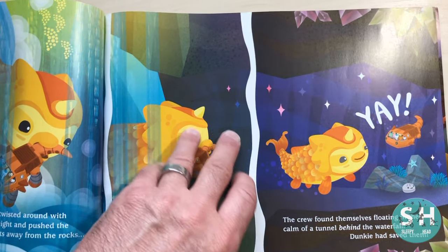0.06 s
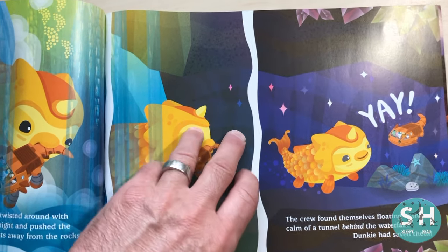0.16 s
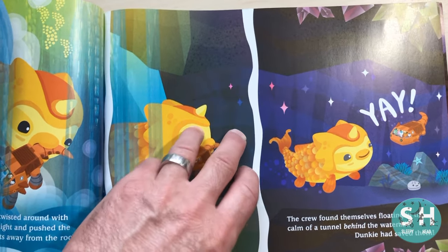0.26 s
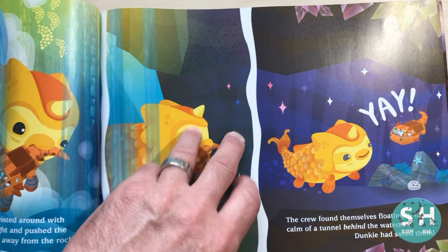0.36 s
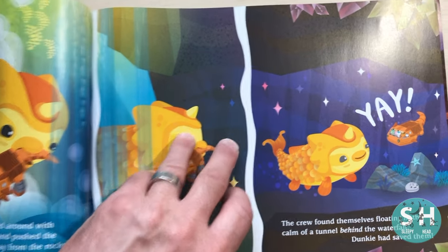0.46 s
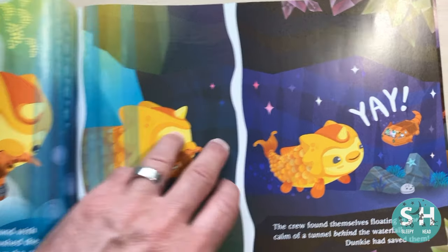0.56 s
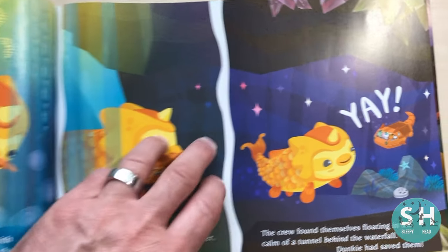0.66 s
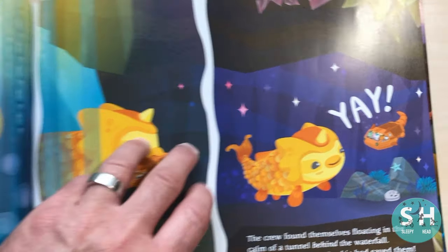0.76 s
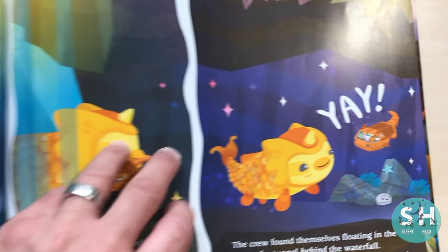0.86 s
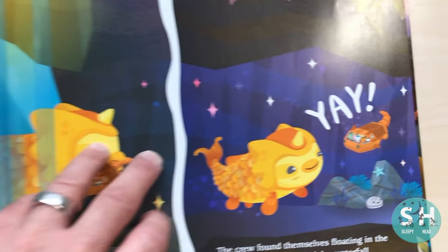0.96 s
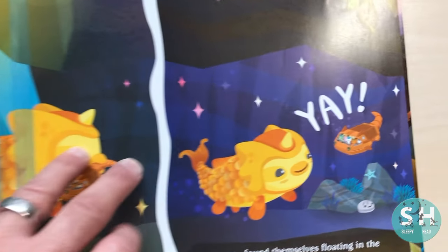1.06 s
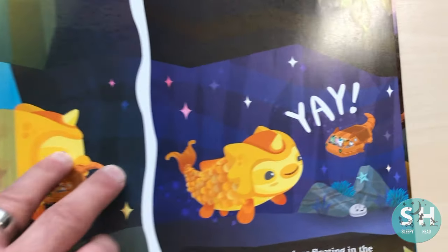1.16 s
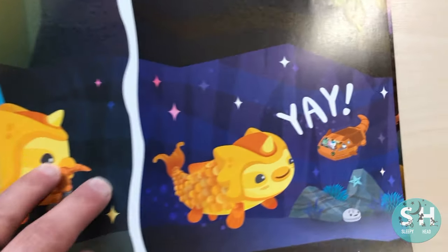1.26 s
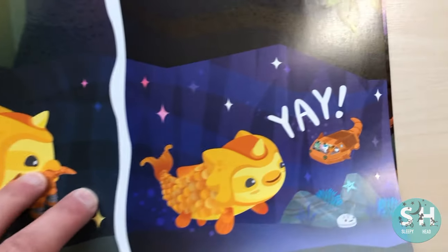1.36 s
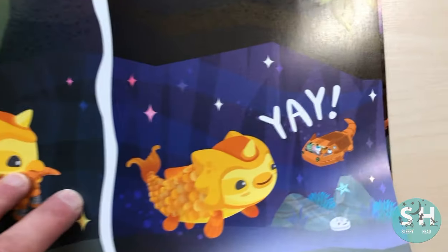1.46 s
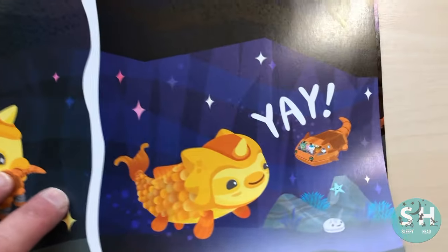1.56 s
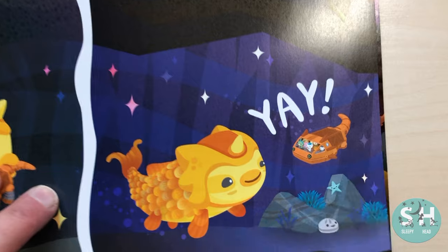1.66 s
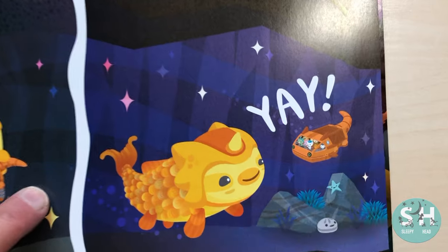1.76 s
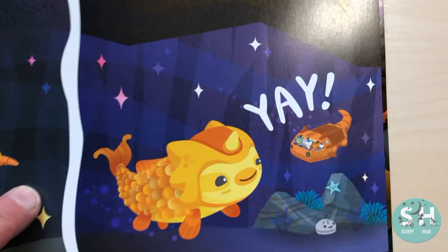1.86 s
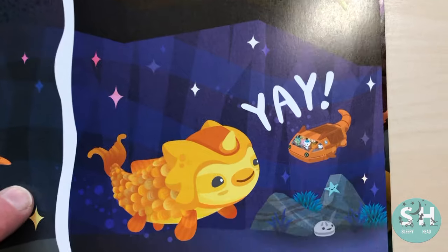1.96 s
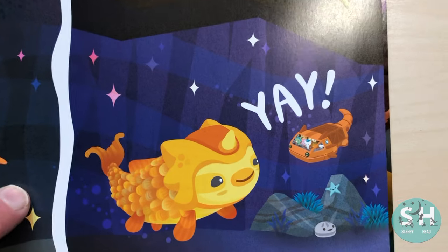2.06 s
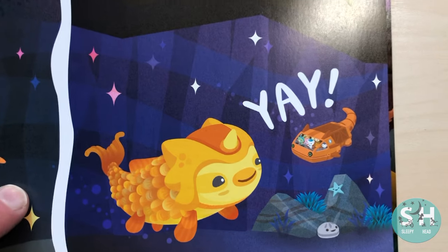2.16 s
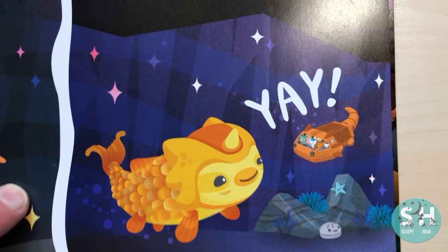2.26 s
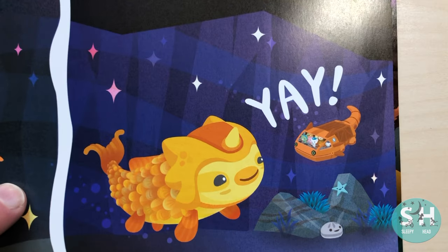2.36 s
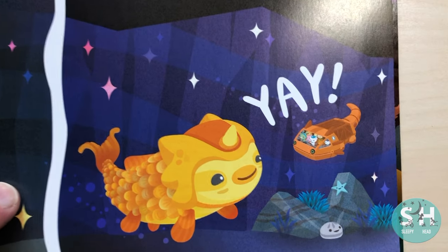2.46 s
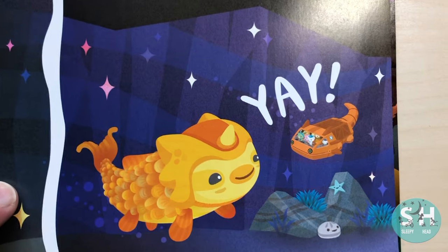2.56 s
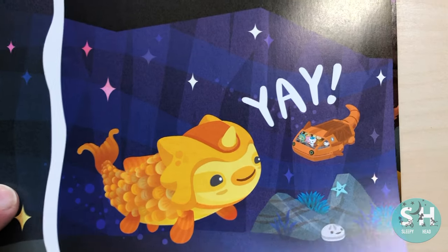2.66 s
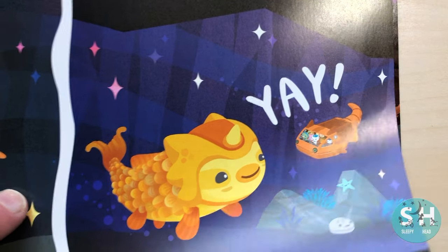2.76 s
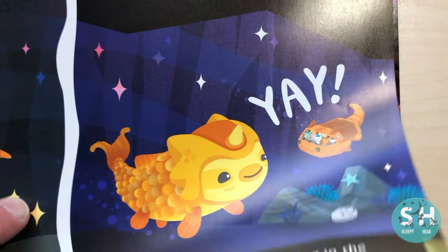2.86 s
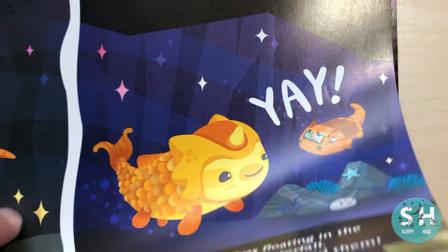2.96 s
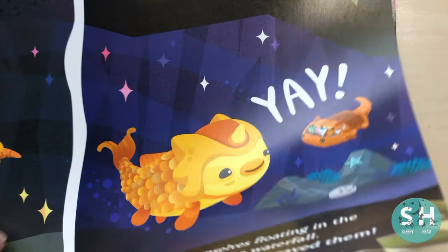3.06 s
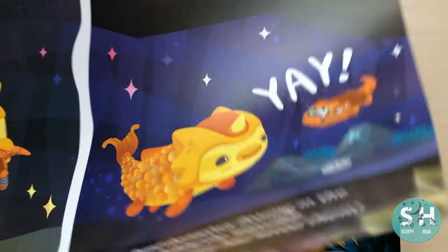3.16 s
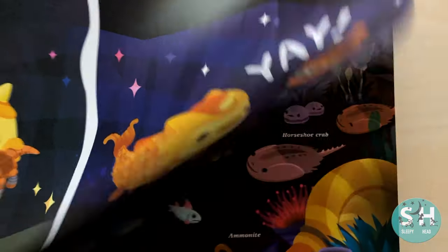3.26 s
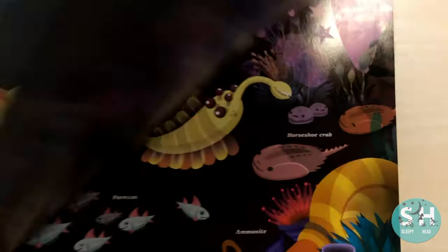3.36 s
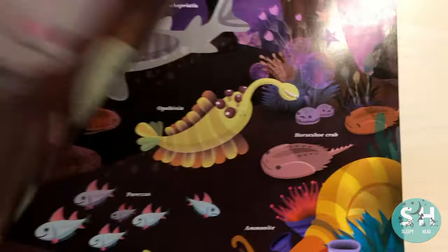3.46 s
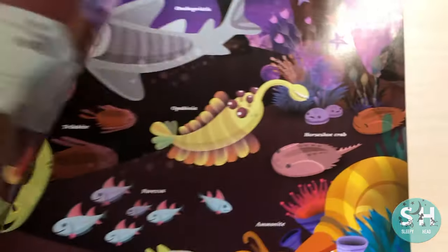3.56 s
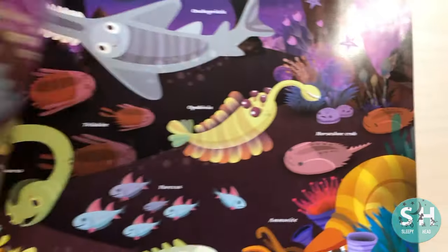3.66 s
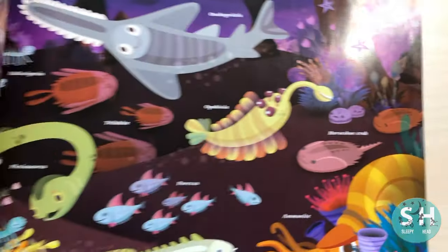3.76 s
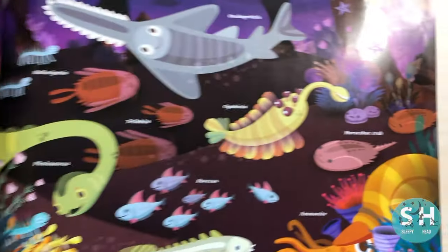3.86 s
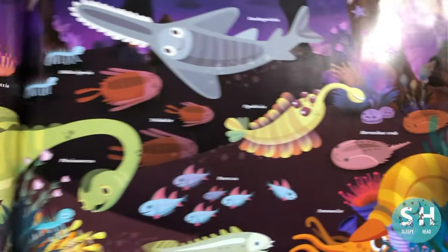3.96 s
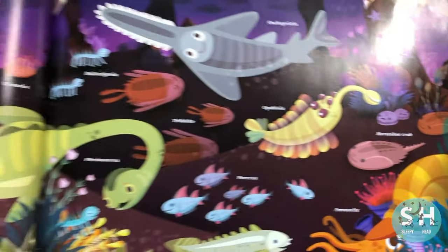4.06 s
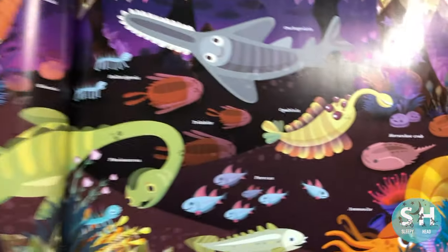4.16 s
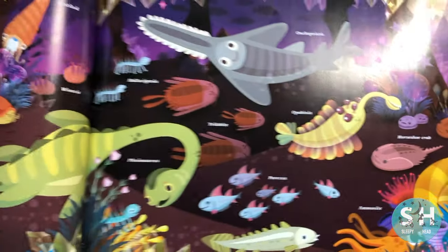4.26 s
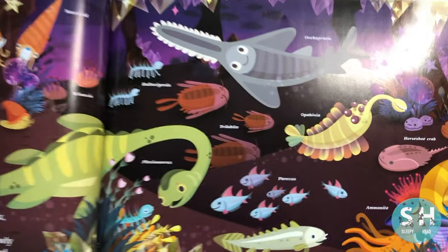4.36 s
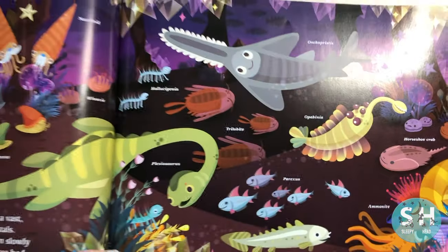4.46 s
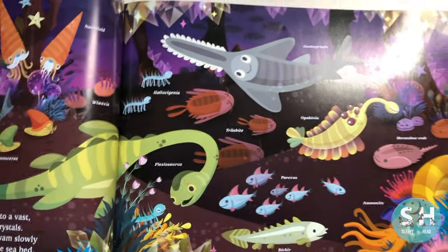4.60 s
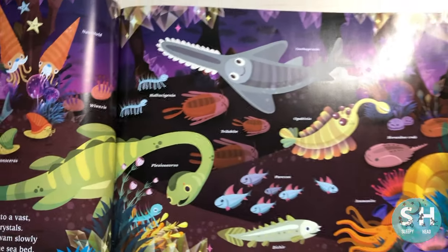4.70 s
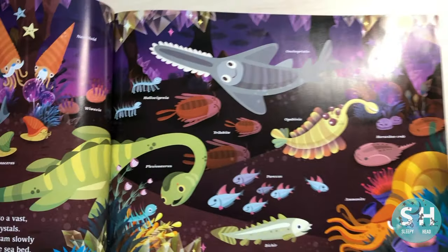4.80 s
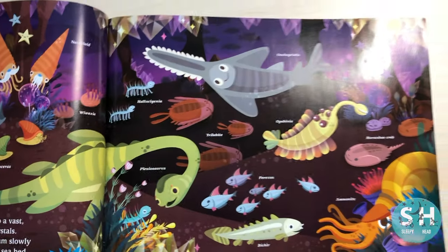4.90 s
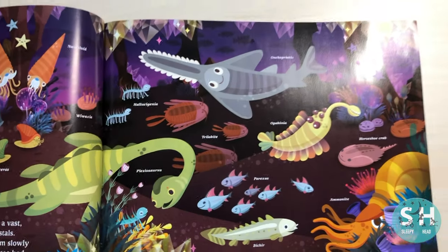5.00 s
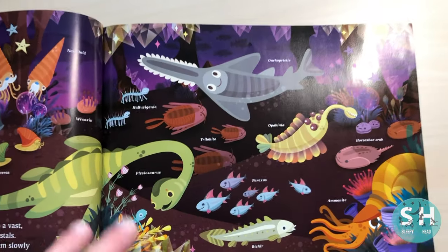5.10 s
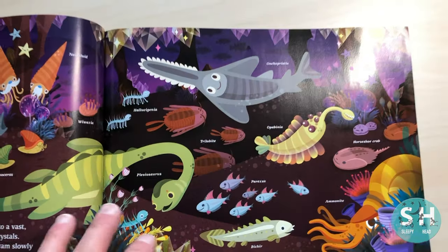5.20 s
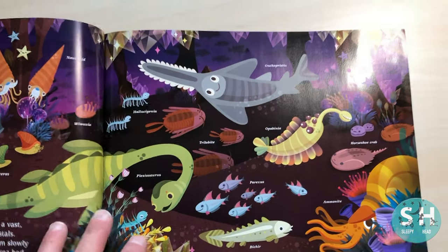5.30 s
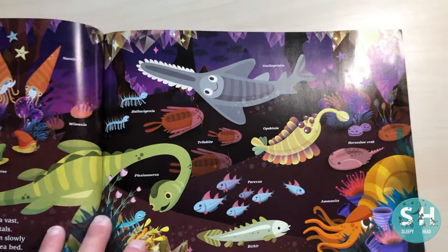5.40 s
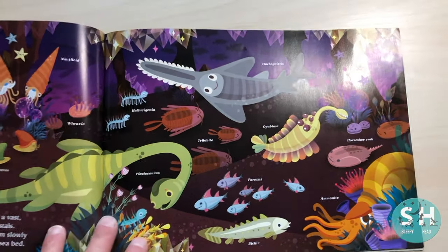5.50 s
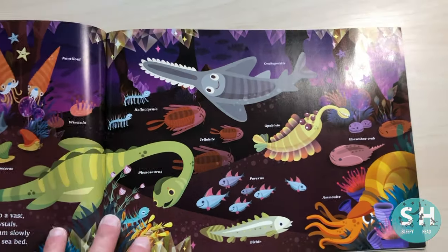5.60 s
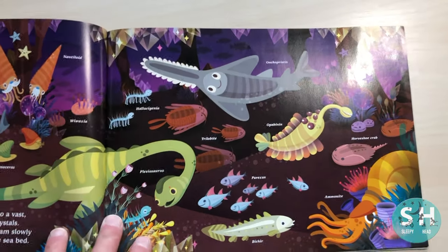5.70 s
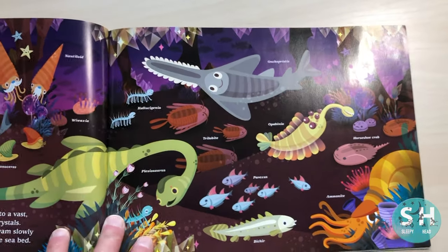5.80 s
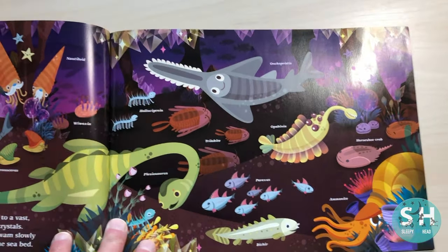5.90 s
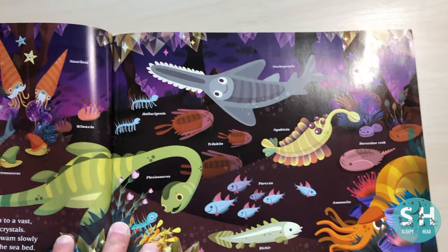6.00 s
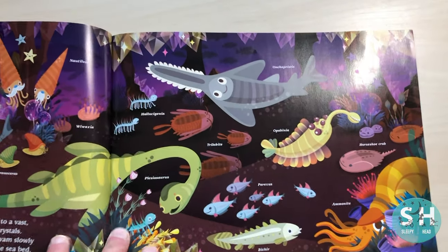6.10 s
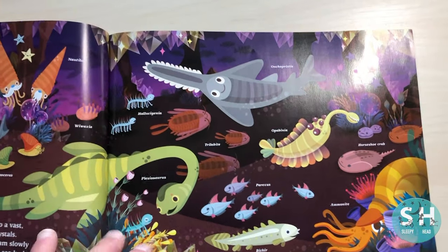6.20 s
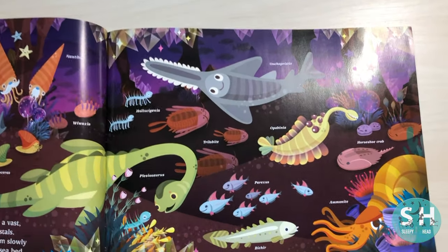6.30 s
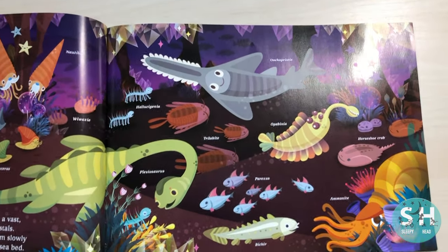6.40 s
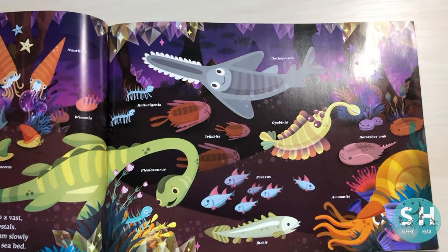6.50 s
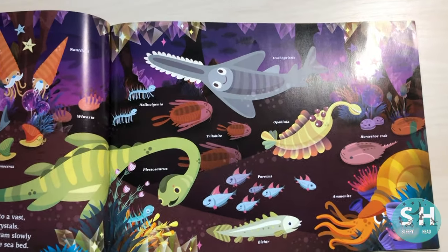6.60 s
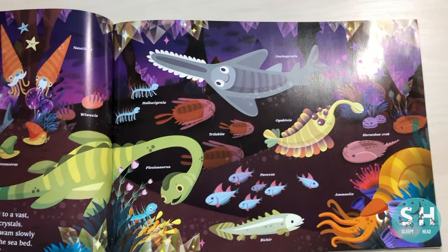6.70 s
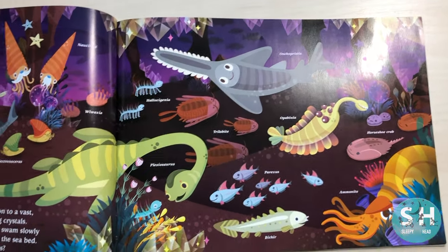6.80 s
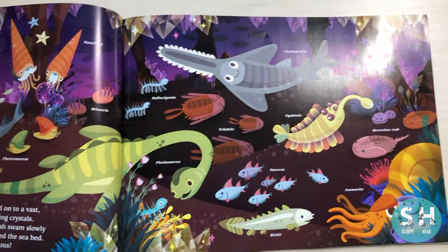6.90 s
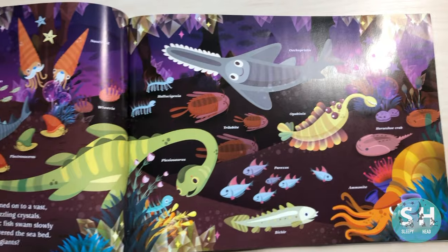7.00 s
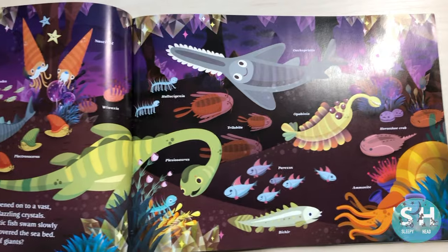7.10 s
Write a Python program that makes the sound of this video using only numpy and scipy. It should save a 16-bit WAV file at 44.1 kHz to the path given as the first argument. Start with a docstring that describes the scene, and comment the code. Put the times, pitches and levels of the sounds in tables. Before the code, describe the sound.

Close, dry paper handling in a quiet humming room: skin slides, small taps, one crackling page turn, then soft smoothing strokes and faint bumps.

```python
"""A fine, grainy hiss of skin on paper is heard first, as a hand slides over a glossy picture book in a quiet room.
Random stick-slip releases excite book, sheet and surface. A pressed finger stutters in rows of ticks,
then a fingertip creaks periodically as a stiff page lifts. The page is turned and smoothed flat: bending, it buckles
in short rattling bursts; paper edges tick as they slip; bumps ring the damped modes of the book on the table.
Behind lie a nearly steady mains hum, ventilation rumble and the air of the room."""
import sys
import numpy as np
from scipy import signal
from scipy.fft import rfft, irfft, next_fast_len
from scipy.io import wavfile

SR = 44100
rng = np.random.default_rng(int(sys.argv[2]) if len(sys.argv) > 2 else 0)


def file_out(sig):
    """Save sig as 16-bit WAV at sys.argv[1]."""
    # one column per channel
    cols = np.atleast_2d(sig).T
    # limit, then scale
    lim = np.clip(cols, -1, 1)
    pcm = np.round(lim * 32767).astype(np.int16)
    wavfile.write(sys.argv[1], SR, pcm)


N = 315199

# Skin or paper rubbing over a page: [t/s, length/s, hiss level/dB, swell over the stroke/dB, pressure/dB,
# sizzle level re hiss/dB]
RUB_STROKES = [(0, 0.098, -57, -11, -12, -5), (0.099, 0.12, -58.5, 2.5, 7, -4),
               (0.212, 0.079, -53.5, -7.5, 7.5, -3), (0.292, 0.14, -61, 1.5, -3, -6.5),
               (0.485, 0.073, -61, -4, -12, -4), (0.549, 0.089, -62, 5, 13, -4.5),
               (0.679, 0.047, -59, 1.5, 8, -6), (0.748, 0.18, -65, -2, 3, -3.5),
               (0.949, 0.23, -61, -3, 7, -3), (1.198, .15, -60.5, -7, -0.5, 0),
               (1.384, 0.1, -71, -5, 13.5, 0.5), (1.486, 0.13, -73.5, 7.5, 23, 3),
               (1.639, 0.14, -66.5, 5, 10, -4), (3.612, 0.13, -65.5, 7.5, 9.5, -8),
               (3.737, 0.081, -53.5, -3, 3.5, -8), (3.835, 0.1, -56.5, 5.5, -4, -3.5),
               (3.958, 0.07, -54.5, 11, -6.5, -3), (4.112, 0.016, -58, 3, 0.5, 1),
               (4.176, 0.11, -64.5, 10.5, -9, -3), (4.28, 0.62, -72.5, -7.5, -0.5, -4.5),
               (5.248, 0.07, -50.5, -2, -18, -6), (5.332, 0.079, -60, 9, -17, -10),
               (5.404, 0.054, -59, 8.5, -4, 2), (5.486, 0.15, -64.5, 1.5, 2.5, -7.5),
               (5.664, 0.17, -76, 10, 11, -3), (5.845, 0.19, -63.5, -3, 7.5, -5.5),
               (6.029, 0.089, -66.5, 2.5, 1.5, 1)]
# The page swinging over in one sweep: [t/s, friction hiss level/dB, flexing level of the sheet/dB]
PAGE_TURN = [(2.57, -80, -64), (2.69, -60, -55.5), (2.95, -52.5, -61), (3.08, -46.5, -71),
             (3.18, -48.5, -51), (3.3, -52.5, -46), (3.39, -51, -53), (3.49, -57.5, -60.5), (3.6, -81, -72)]
# Friction hiss, and its fine top: [f/Hz, relative level per Hz/dB]
HISS_SPECTRUM = [(1470, -18), (2500, -0.5), (2840, -10), (3150, 1), (3600, 0.5), (4130, 5), (6350, -2.5),
                 (7110, -9), (8500, -29), (11000, -29), (18700, -120)]
SIZZLE_SPECTRUM = [(4120, -51), (7000, 2.5), (7870, 4), (8860, 4.5), (10200, 1), (13600, -1), (15100, 3),
                   (16000, -23)]
# Colour of the sheet pressed flat, lifted free, and smoothed down: [f/Hz, relative level per Hz/dB]
FLAT_SPECTRUM = [(350, -49), (600, -21), (637, 2), (770, -1), (948, -1.5), (1080, 3), (1170, -7),
                 (1310, -3), (1500, -6.5), (2000, -9), (3000, -15.5), (3900, -57), (6600, -120)]
FREE_SPECTRUM = [(350, -29), (600, -3), (759, 1), (852, -7), (929, -1), (1010, -5.5), (1310, -0.5),
                 (1600, -2), (1980, -6), (2140, -9), (3000, -10), (3900, -37), (6600, -120)]
SMOOTHED_SPECTRUM = [(350, -37), (600, -5.5), (941, 3.5), (1220, -1), (1330, -8), (1410, -8), (1790, -5.5),
                     (2400, -9.5), (2850, -6.5), (3130, -10.5), (3500, -14), (4550, -35), (7700, -120)]
# Resonances of the book under a rubbing hand: [f/Hz, width/Hz, relative level/dB]
RUBBED_BOOK_MODES = [(153.6, 23.3, -2), (254, 51, -10.5), (331.7, 30, -6), (428, 14, -5.5),
                     (494, 37, -12.5), (642, 31, -12)]
# Buckling or skidding of the sheet: [t/s, level/dB, treble level re middle/dB, length/s]
BUCKLE_EVENTS = [(0.13, -35.5, -14.5, 0.033), (0.218, -48, -18, 0.025), (0.534, -37, -10, 0.027),
                 (2.867, -36, -9, 0.008), (3.006, -43, 0, .008), (3.028, -35, 0, 0.011),
                 (3.054, -37.5, 1, 0.029), (3.0934, -28.5, -3, 0.011), (3.108, -36, 1.5, 0.033),
                 (3.13, -34, -7.5, 0.046), (3.202, -29.5, -7, 0.014), (3.232, -40, -13, 0.018),
                 (3.252, -26.5, -7.5, 0.01), (3.268, -29, -7, 0.0082), (3.294, -34, 1.5, 0.009),
                 (3.334, -35, -5, 0.011), (3.809, -39.5, -10, 0.0079), (3.84, -42, 3.5, 0.016),
                 (3.961, -52.5, 13, 0.012), (3.993, -53.5, 11.5, 0.042), (4.138, -49.5, -6, 0.011)]
# Resonances of the bent sheet: [f/Hz, width/Hz, relative level/dB]
BENT_SHEET_MODES = [(843, 70, -10.5), (1006, 91, -1.5), (1360, 36, -4), (1660, 250, -7.5), (2155, 120, -24),
                    (2910, 320, -7), (3290, 190, -13), (4130, 710, -4.5), (5560, 1900, -17),
                    (6650, 400, -36.5)]
# Sticking and slipping of a fingertip as the glossy page lifts: [t/s, slip rate/Hz, level/dB]
CREAK_COURSE = [(2.574, 58, -52), (2.608, 45.3, -49), (2.635, 65.4, -66), (2.65, 90, -62),
                (2.654, 160, -47.5), (2.674, 195, -48.5), (2.714, 210, -46), (2.735, 160, -42.5),
                (2.755, 160, -42.5), (2.765, 66, -48), (2.791, 61, -44)]
# Resonances of the page under that fingertip: [f/Hz, width/Hz, relative level/dB]
CREAKING_PAGE_MODES = [(306, 46, 7), (622, 25, 5.5), (823, 39, 1.5), (1080, 190, -1), (1470, 330, -12),
                       (2240, 280, -10.5), (3070, 210, -3.5), (4100, 1000, -8), (5160, 530, -7),
                       (6700, 2500, -16)]
# Stuttering of a pressed finger over the gloss: [t/s, length/s, first gap/s, snap level/dB];
# snap levels here and in the next table precede the common trims in ticks()
STUTTER_ROWS = [(1.4815, .096, .0193, -51), (1.599, .031, 0.0085, -48.5), (1.7155, .034, .017, -53),
                (1.763, .015, 0.0099, -55)]
# Ticks of paper edges and fingertips, before a common lag and trims:
# [t/s, snap level/dB, knock level/dB, crisp top level/dB]
TICK_EVENTS = [(0.8202, -55, -51, -65), (0.859, -52, -53, -78), (1.0293, -49, -53, -46),
               (1.0518, -38, -41, -39), (1.0544, -37.5, -48, -37.5), (1.1278, -56, -53, -65),
               (1.319, -44.5, -43, -60), (1.3872, -50, -47.5, -60), (1.42, -52, -52, -67),
               (1.7, -41.5, -36.5, -61), (2.58, -60, -53, -55), (2.805, -44, -50, -54),
               (2.8486, -32, -39, -47), (3.6403, -51, -49, -47.5), (3.763, -45, -48, -48),
               (4.14, -68, -41.5, -68), (5.2523, -42.5, -50, -52), (5.6521, -68, -45, -66),
               (5.714, -55, -46, -60), (5.7544, -56, -43, -60), (5.853, -51, -51, -53.5),
               (5.9748, -51, -39.5, -65), (6.0228, -51, -38.5, -66), (6.9962, -72, -59, -77)]
# Modes of a tapped page lying on the others: [f/Hz, relative level/dB, t60/s]
TAPPED_PAGE_MODES = [(634, -7, 0.089), (905, 5.5, 0.022), (1058, 1.5, 0.026), (1287, 7, 0.0094),
                     (1720, -1.5, 0.015), (2370, -3.5, 0.024)]
# Soft bumps on the book, before a common trim: [t/s, level/dB]
BUMP_EVENTS = [(0.705, -38), (0.863, -42.5), (1.035, -37), (1.067, -32.5), (1.319, -42.5), (1.7, -30),
               (1.714, -38.5), (2.664, -35), (2.743, -35), (3.84, -42), (4.143, -46.5), (5.652, -38.5),
               (5.755, -47), (5.974, -47), (6.023, -52), (6.997, -46.5)]
# Modes of the book on the table: [f/Hz, relative level/dB, t60/s]
STRUCK_BOOK_MODES = [(75.3, -4.5, 0.5), (127, 10, 0.02), (175.7, 1.5, 0.16), (267, -13.5, 0.063),
                     (342.2, -4, 0.2), (429, -1, 0.041), (645, -6, 0.088), (848, -16.5, 0.11)]
# Mains hum: [f/Hz, rms level before slight variation/dB]
HUM_PARTIALS = [(119.9, -49.5), (239.8, -66)]
# Air of the room, and ventilation rumble: [f/Hz, relative level per Hz/dB]
AIR_SPECTRUM = [(88, -31), (150, -4), (209, -9), (240, -4), (270, -9.5), (383, -16.5), (422, -13.5),
                (475, -18.5), (601, -22), (745, -24.5), (1040, -25.5), (1480, -30.5), (1630, -27),
                (1760, -31.5), (16000, -43)]
RUMBLE_SPECTRUM = [(22, -46), (40, -22.5), (57, 6), (78, -13.5), (100, -0.5), (120, 1), (145, -4),
                   (180, -15)]

AIR_DB, RUMBLE_DB = -57, -54  # rms
ROOM_T60_S, ROOM_DB = 0.21, -14.5
CUTOFF_HZ = 16100
ATTACK_SHARE = 0.13  # share of a rub's length added to its attack
ATTACK_S, RELEASE_S, BODY_RELEASE_S = 0.0052, 0.017, 0.027
# Pressure rumbles the book, and a share of it flexes the sheet
BODY_DB, FLEX_DB, FLEX_SHARE = -1, 0.5, 0.56
# The turning page's sizzle dulls as it leaves the other pages; the book follows a share of the hiss swell
TURN_SIZZLE_DB, DULLING_DB_PER_S = -1, 10
TURN_BODY_DB, TURN_BODY_SHARE = -54.5, 0.45
LIFTED_S, LAID_DOWN_S = 2.3, 5.0  # the sheet's colour changes at these times
STEADY_GAP_S = .009
STUTTER_KNOCK_DB, STUTTER_TOP_DB = -3, -14  # re the snap


def rubbing(judder_db=2.0, judder_rate=110, flat_db=0, smoothed_db=3, hiss_db=0, sizzle_db=0, crinkle_db=-12):
    """Stick-slip friction: fine slips excite book, sheet and surface; the heavy parts judder most."""
    t = np.arange(N) / SR
    judder = judder_db * drift(judder_rate)
    coarse = slips(per_s=3000, spread_db=2.5)
    fine = slips(per_s=15000, spread_db=4.0)
    # stray crinkles stand out of the hiss
    fine = fine + from_db(crinkle_db) * slips(per_s=93, spread_db=2.2)
    book = rms_one(ring_resonances(coarse, RUBBED_BOOK_MODES))
    surface = from_db(hiss_db) * coloured(fine, HISS_SPECTRUM)
    sheen = from_db(sizzle_db) * coloured(fine, SIZZLE_SPECTRUM)
    flat = from_db(flat_db) * coloured(coarse, FLAT_SPECTRUM)
    free = coloured(coarse, FREE_SPECTRUM)
    smoothed = from_db(smoothed_db) * coloured(coarse, SMOOTHED_SPECTRUM)
    sheet = np.select([t < LIFTED_S, t < LAID_DOWN_S], [flat, free], smoothed)
    body, flex, hiss, sizzle = rub_gains() + turn_gains()
    heavy = (body * book + flex * sheet) * from_db(judder)
    light = (hiss * surface + sizzle * sheen) * from_db(.5 * judder)
    return heavy + light


def rub_gains():
    """Load-dependent friction: pressure sets the book and sheet gains, which die away later than hiss and sizzle."""
    gains = np.zeros((4, N))
    for s, length_s, db, swell_db, pressure_db, sizzle_db in RUB_STROKES:
        light = from_db(db) * stroke(s, length_s, swell_db, RELEASE_S)
        heavy = from_db(db) * stroke(s, length_s, swell_db, BODY_RELEASE_S)
        gains += [heavy * from_db(BODY_DB + pressure_db),
                  heavy * from_db(FLEX_DB + FLEX_SHARE * pressure_db),
                  light,
                  light * from_db(sizzle_db)]
    return gains


def stroke(start_s, length_s, swell_db, release_s):
    """Envelope of one rub: an attack, slower for a long rub, a swelling or fading hold, an exponential release."""
    age = np.maximum(np.arange(N) / SR - start_s, 0)
    attack = np.minimum(age / (ATTACK_S + ATTACK_SHARE * length_s), 1)
    hold = from_db(swell_db * (np.minimum(age / length_s, 1) - .5))
    return attack * hold * np.exp(-np.maximum(age - length_s, 0) / release_s)


def turn_gains():
    """Interpolated excitation of book, sheet, hiss and sizzle while the page swings over."""
    t = np.arange(N) / SR
    s, hiss, flex = np.transpose(PAGE_TURN)
    hiss, flex = np.interp(t, s, hiss), np.interp(t, s, flex)
    body = TURN_BODY_DB + TURN_BODY_SHARE * (hiss - hiss.max())
    sizzle = hiss + TURN_SIZZLE_DB - DULLING_DB_PER_S * (t - s[0])
    turning = (t > s[0]) & (t < s[-1])
    return from_db([body, flex, hiss, sizzle]) * turning


def buckles(rise_s=0.0018, tail_db=-19, tail_s=0.012, raw_db=-13, split_hz=2600, level_db=0):
    """Buckling instability: a rush of slips holds briefly, collapses, and rattles the modes of the sheet."""
    t = np.arange(SR // 4) / SR
    force, bright = np.zeros(N), np.zeros(N)
    for s, db, treble_db, length_s in BUCKLE_EVENTS:
        collapse = np.exp(-(t / length_s) ** 2) + from_db(tail_db) * np.exp(-t / tail_s)
        shape = (1 - np.exp(-t / rise_s)) * collapse
        add(force, s, from_db(db) * shape)
        add(bright, s, from_db(db + treble_db) * shape)
    rush = slips(per_s=5000, spread_db=0.5)
    sheet = ring_resonances(rush, BENT_SHEET_MODES)
    sheet = rms_one(sheet + from_db(raw_db) * band(rush, 595, 6400))
    low = signal.sosfiltfilt(signal.butter(2, split_hz, fs=SR, output="sos"), sheet)
    return from_db(level_db) * (force * low + bright * (sheet - low))


def glancing(x, rate=5):
    """Comb filtering: early reflections off table and curved page shift with the hand and move the notches."""
    n, out = np.arange(N), x.copy()
    for lag_s, sway, gain in ((.0011, .14, -.22), (.0034, .06, .25)):
        lag = SR * lag_s * (1 + sway * drift(rate))
        out += gain * np.interp(n - lag, n, x)
    return out * np.std(x) / np.std(out)


def creak(level_db=0, scrape_db=-9, scrape_s=0.0011, uneven_db=1.0):
    """Periodic stick-slip: the fingertip lets go once a cycle, with a brief scrape, and rings the page."""
    s, per_s, db = np.transpose(CREAK_COURSE)
    t = np.arange(s[0], s[-1], 1 / SR)
    cycles = np.ceil(np.cumsum(np.interp(t, s, per_s)) / SR)
    age, force = np.arange(SR // 100) / SR, np.zeros(N)
    for at in t[np.diff(cycles, prepend=0) > 0]:
        release = from_db(scrape_db) * rng.standard_normal(len(age)) * np.exp(-age / scrape_s)
        release[0] += 1
        gain = from_db(np.interp(at, s, db) + uneven_db * rng.standard_normal())
        add(force, at, gain * release / np.sqrt(np.sum(release ** 2)))
    page = ring_resonances(force, CREAKING_PAGE_MODES)
    # the level is that of one slip over its first 4 ms
    return from_db(level_db) * page * np.sqrt(.004 * SR * np.sum(force ** 2) / np.sum(page ** 2))


def ticks(snap_db=-3.5, knock_db=-3.0, top_db=-1, lag_s=.0007):
    """Impulsive release: a snap with a crisp top and a duller, longer knock of the sheet."""
    out = np.zeros(N)
    for s, snap, knock, top in TICK_EVENTS + stutters():
        snap_part = tick_part(low_hz=2280, high_hz=5640, decay_s=0.0017, scatter=0.11)
        add(out, s + lag_s, from_db(snap + snap_db) * snap_part)
        top_part = tick_part(low_hz=6600, high_hz=14500, decay_s=0.002, scatter=0.079)
        add(out, s + lag_s, from_db(top + top_db) * top_part)
        knock_part = unit_hit(struck(TAPPED_PAGE_MODES, uneven_db=-0.5))
        add(out, s + lag_s, from_db(knock + knock_db) * knock_part)
    return out


def stutters(uneven_db=-1.0):
    """Stick-slip of a pressed finger: with every slip the gap moves halfway towards a steady beat."""
    rows = []
    for start_s, length_s, gap_s, db in STUTTER_ROWS:
        s = start_s
        while s < start_s + length_s:
            snap = db + uneven_db * rng.standard_normal()
            rows.append((s, snap, snap + STUTTER_KNOCK_DB, snap + STUTTER_TOP_DB))
            s += gap_s
            gap_s = (gap_s + STEADY_GAP_S) / 2
    return rows


def tick_part(low_hz, high_hz, decay_s, scatter):
    """Impulse and scattering: one sharp release and its decaying echoes within the paper, band-limited."""
    t = np.arange(SR // 16) / SR
    pulse = scatter * rng.standard_normal(len(t)) * np.exp(-t / decay_s)
    pulse[0] += 1
    return unit_hit(band(pulse, low_hz, high_hz, order=3))


def bumps(level_db=-6):
    """Impact excitation: each bump rings the damped modes of the book on the table."""
    out = np.zeros(N)
    for s, db in BUMP_EVENTS:
        add(out, s, from_db(db + level_db) * struck(STRUCK_BOOK_MODES, uneven_db=4.0))
    return out


def struck(modes, uneven_db):
    """Modal superposition: one blow rings decaying sinusoids, each with a random strength of its own."""
    t = np.arange(SR // 3) / SR
    out = np.zeros(len(t))
    for k, (hz, db, t60) in enumerate(modes):
        decay = from_db(db + uneven_db * rng.standard_normal() - 60 * t / t60)
        out += (-1) ** k * decay * np.sin(2 * np.pi * hz * t)
    return out


def room(x, gap_s=0.00338):
    """Reverberation: dull, quickly dying reflections from table and walls, as decaying noise."""
    t = np.arange(SR // 2) / SR
    echoes = band(rng.standard_normal(len(t)), 200, 5100) * from_db(-60 * t / ROOM_T60_S) * (t > gap_s)
    echoes = echoes / np.sqrt(np.sum(echoes ** 2))
    return x + from_db(ROOM_DB) * signal.fftconvolve(x, echoes)[:N]


def background(vary_db=0.8, vary_rad=0.08):
    """Tones and noise: a nearly steady mains hum, slightly varied in level and phase, air and ventilation rumble."""
    t = np.arange(N) / SR
    hum = np.zeros(N)
    for hz, db in HUM_PARTIALS:
        amplitude = np.sqrt(2) * from_db(db + vary_db * drift(2.94))
        hum += amplitude * np.sin(2 * np.pi * hz * t + vary_rad * drift(6.9))
    air = from_db(AIR_DB) * coloured(rng.standard_normal(N), AIR_SPECTRUM)
    rumble = from_db(RUMBLE_DB) * coloured(rng.standard_normal(N), RUMBLE_SPECTRUM)
    return hum + air + rumble


def slips(per_s, spread_db):
    """Random point process: tiny stick-slip releases of uneven size and either sign; rms 1."""
    sizes = from_db(spread_db * np.minimum(rng.exponential(1, N), 4)) * rng.choice([-1, 1], N)
    return rms_one(sizes * (rng.random(N) < per_s / SR))


def drift(rate):
    """Slow random modulation: chance values, `rate` a second, joined by straight lines; rms 1."""
    knots = rng.standard_normal(4000)
    return rms_one(np.interp(np.arange(N) / SR * rate, np.arange(len(knots)), knots))


def coloured(x, spectrum):
    """Spectral shaping: weight x by a spectrum that falls 36 dB per octave beyond its ends; rms 1."""
    hz, db = np.transpose(spectrum)
    size = next_fast_len(N)
    octave = np.log2(np.maximum(np.fft.rfftfreq(size, 1 / SR), 1))
    beyond = np.abs(octave - np.clip(octave, np.log2(hz[0]), np.log2(hz[-1])))
    gain = from_db(np.interp(octave, np.log2(hz), db) - 36 * beyond)
    return rms_one(irfft(rfft(x, size) * gain, size)[:N])


def ring_resonances(x, modes):
    """Parallel resonators driven by x and summed with alternating sign."""
    return sum((-1) ** k * from_db(db) * resonate(x, hz, width) for k, (hz, width, db) in enumerate(modes))


def resonate(x, hz, width_hz):
    """Damped resonance: a pole pair with gain about 1 at its top."""
    r = np.exp(-np.pi * width_hz / SR)
    zeros = np.array([1, 0, -1]) * (1 - r * r) / 2
    poles = [1, -2 * r * np.cos(2 * np.pi * hz / SR), r * r]
    return signal.lfilter(zeros, poles, x)


def band(x, low_hz, high_hz, order=2):
    """Causal band-pass."""
    sos = signal.butter(order, [low_hz, min(high_hz, .45 * SR)], "band", fs=SR, output="sos")
    return signal.sosfilt(sos, x + 1e-18)


def unit_hit(x):
    """Energy normalisation: scale a hit to the energy of 4 ms at rms 1."""
    return x / np.sqrt(np.sum(x ** 2) / (.004 * SR))


def rms_one(x):
    """Power normalisation: scale to rms 1."""
    return x / np.sqrt(np.mean(x ** 2) + 1e-20)


def from_db(db):
    """Logarithmic level: decibels to amplitude gain."""
    return 10 ** (np.asarray(db) / 20)


def add(out, s, sound):
    """Superposition: mix a short sound in at time s."""
    start = max(round(s * SR), 0)
    out[start:start + len(sound)] += sound[:N - start]


def scene():
    """Superposition of sources: the book close by with its reverberation, and the background."""
    friction = glancing(rubbing() + buckles())
    book = friction + creak() + ticks() + bumps()
    return (room(book) + background())[None]


def record(dry):
    """Low-pass filtering: an elliptic filter cuts the top steeply."""
    return signal.sosfilt(signal.ellip(10, .1, 70, CUTOFF_HZ, fs=SR, output="sos"), dry)


dry = scene()
out = record(dry)
file_out(out)
```